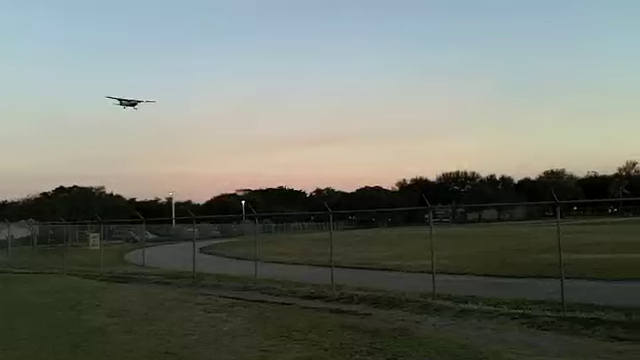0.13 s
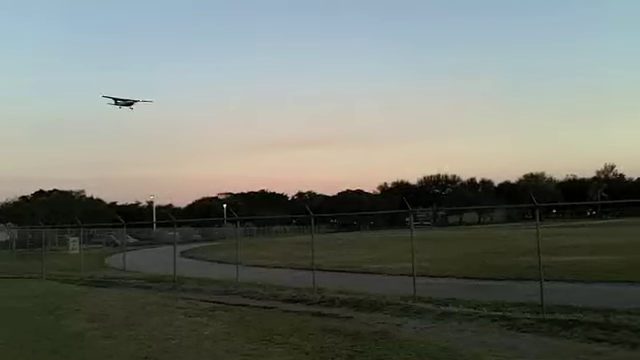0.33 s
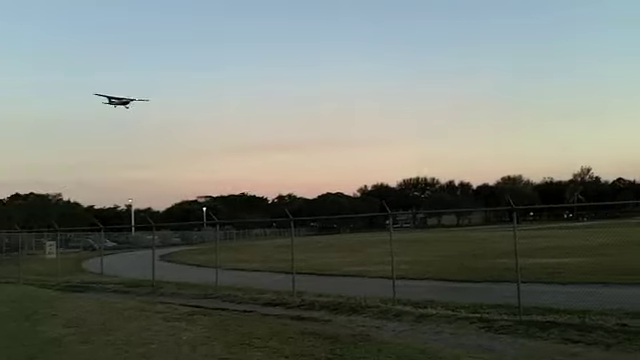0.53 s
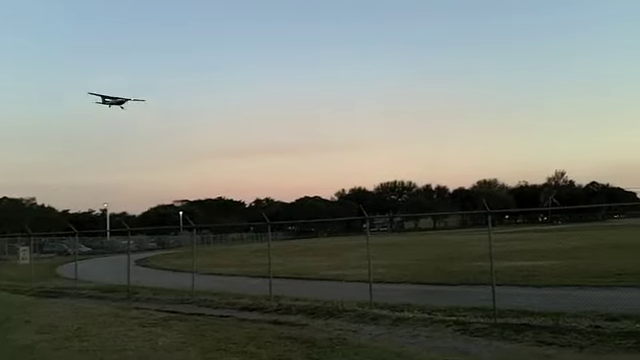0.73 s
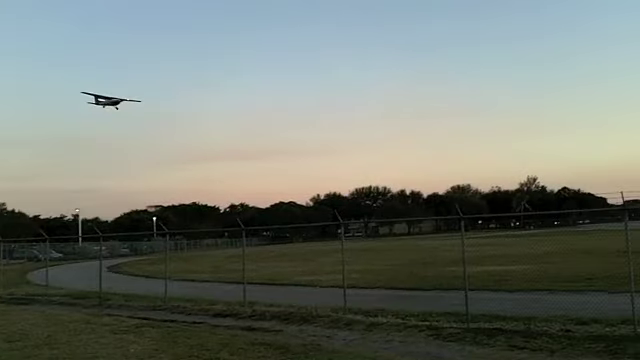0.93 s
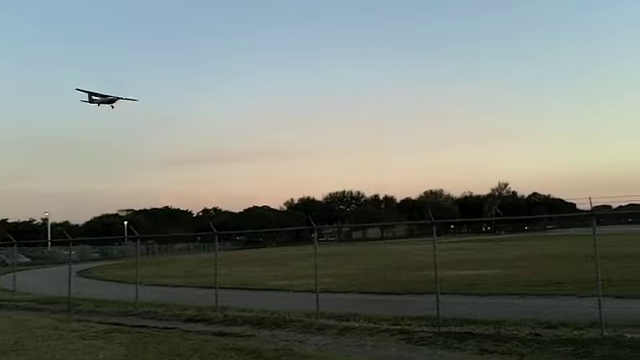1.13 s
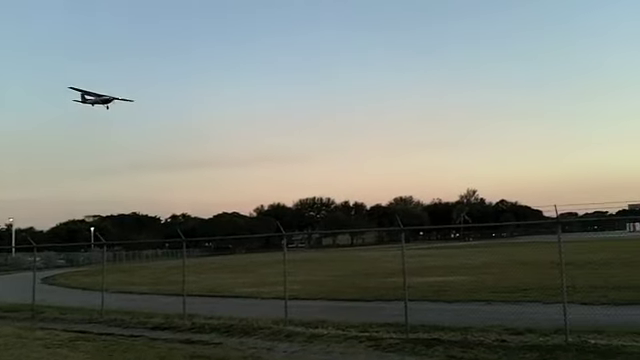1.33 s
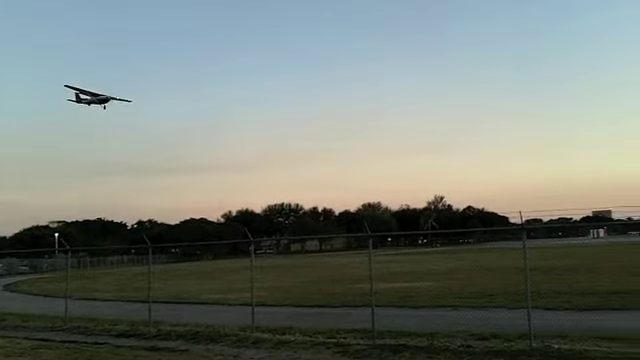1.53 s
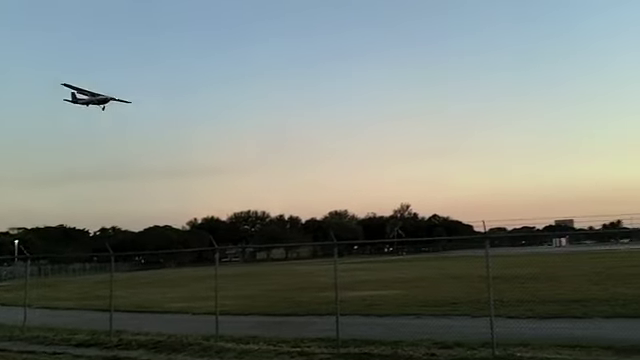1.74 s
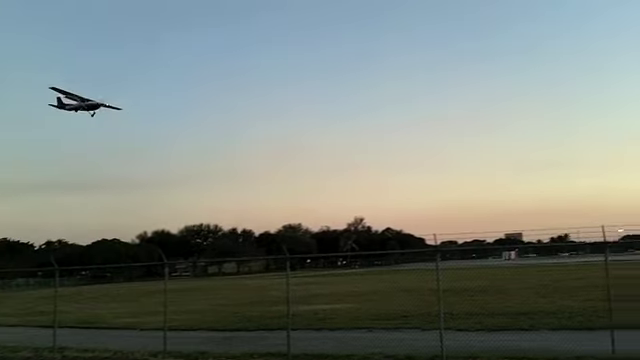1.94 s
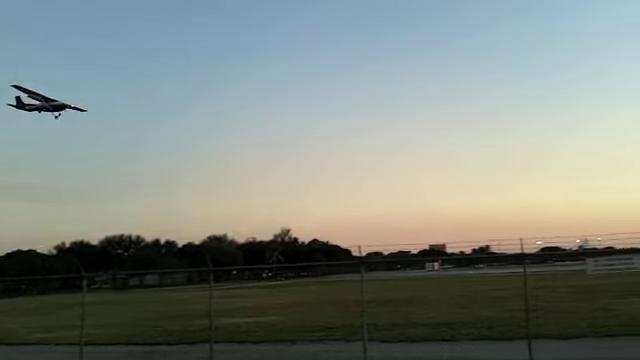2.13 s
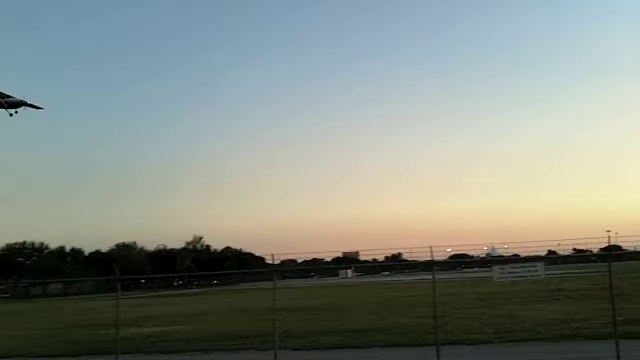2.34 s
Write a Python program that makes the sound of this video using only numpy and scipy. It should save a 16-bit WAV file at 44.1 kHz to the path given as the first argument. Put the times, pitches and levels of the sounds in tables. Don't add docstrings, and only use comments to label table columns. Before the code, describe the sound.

A small propeller plane approaches low over an open airfield, its throbbing drone swelling and sagging in pitch, with rushing propeller wind. A parked engine ticks and hums behind; small camera microphone, dull treble, faint hiss.

```python
import sys
import numpy as np
from scipy import signal
from scipy.fft import rfft, irfft, next_fast_len
from scipy.io import wavfile
from scipy.ndimage import uniform_filter1d, map_coordinates

SR = 44100
rng = np.random.default_rng(int(sys.argv[2]) if len(sys.argv) > 2 else 0)


def ratio_of_db(decibels):
    return 10 ** (np.asarray(decibels, float) / 20)


def store_pcm(level_fs):
    pcm = np.round(np.clip(level_fs, -1, 1) * 32767).astype(np.int16)
    wavfile.write(sys.argv[1], SR, np.atleast_2d(pcm).T)


N = 110250
T = np.arange(N) / SR


def unit(x):
    return x / np.sqrt(np.mean(x ** 2) + 1e-20)


def curve(rows):
    return np.interp(T, *np.transpose(rows))


def wobble(rate_hz):
    coarse = T[::64]
    points = rng.standard_normal(int(N * rate_hz / SR) + 4)
    return np.interp(T, coarse, map_coordinates(points, [coarse * rate_hz]))


def filtered(x, response):
    m = next_fast_len(N + 8192)
    return irfft(rfft(x, m) * response(np.fft.rfftfreq(m, 1 / SR)), m)[..., :N]


def low_pass(x, corner_hz, order):
    return filtered(x, lambda hz: 1 / (1 + (hz / corner_hz) ** order))


def rush(points, patchy_db):
    z = signal.stft(rng.standard_normal(N), nperseg=512)[2]
    patches = uniform_filter1d(rng.standard_normal(z.shape), 8, 0)
    patches = uniform_filter1d(patches, 4, 1)
    x = signal.istft(z * ratio_of_db(patchy_db * unit(patches)), nperseg=512)[1][:N]
    f, db = np.transpose(points)
    return unit(filtered(x, lambda hz: ratio_of_db(np.interp(np.log(hz + 1), np.log(f), db, -120, -120))))


def gate(turns, start, share, edge, scatter_db):
    u = turns - start + 1
    sizes = ratio_of_db(scatter_db * rng.standard_normal(200))[u.astype(int)]
    return sizes * np.clip(np.minimum(u % 1, share - u % 1) / edge, 0, 1)


def tone(turns, db, wobble_db, wander):
    level = ratio_of_db(db + wobble_db * wobble(5.88))
    return np.sqrt(2) * level * np.cos(2 * np.pi * turns + wander * wobble(8))


# (f/Hz, level/dB per Hz)
HISS_COLOUR = [(3000, 0), (11500, 0), (13000, -3), (16000, -4)]
# (f/Hz, level/dB rms)
WHINE_TONES = [(11538, -83), (13966, -84), (14566, -85.5)]


def camera_noise():
    frame_hz, mains_hz = 29.97, 59.94
    hiss = ratio_of_db(-69) * rush(HISS_COLOUR, patchy_db=1.5)
    whine = sum(tone(hz * T, db, wobble_db=1.5, wander=.1) for hz, db in WHINE_TONES)
    whine = whine * unit(gate(frame_hz * T, start=.33, share=.5, edge=.12, scatter_db=1))
    clicks = np.diff((mains_hz * T + 1 - .62).astype(int), prepend=0)
    buzz = unit(filtered(clicks, lambda hz: np.exp(-((hz - 8000) / 600) ** 2)))
    return hiss + whine, ratio_of_db(-91) * buzz


# (f/Hz, level/dB rms)
IDLING_TONES = [(54.3, -42.5), (67.7, -45.5), (102.2, -40), (108.5, -45.5), (135.4, -47), (163, -46),
                (217, -53.5)]
# (f/Hz, level/dB per Hz)
RUMBLE_COLOUR = [(12, -20), (25, -5), (45, -8.5), (110, 10), (170, -3), (260, -15), (500, -44)]
# (f/Hz, level/dB per Hz)
AIR_COLOUR = [(200, -19), (480, 0), (680, -3), (1200, -0.5), (2000, -4.5), (4300, -11.5), (7500, -25.5),
              (10000, -41)]


def airfield():
    hum = sum(tone(hz * T + rng.random(), db, wobble_db=1.5, wander=.74) for hz, db in IDLING_TONES)
    rumble = ratio_of_db(-35.5 + .88 * wobble(6.9)) * rush(RUMBLE_COLOUR, patchy_db=.9)
    air = ratio_of_db(-42.5 + .27 * wobble(5.4)) * rush(AIR_COLOUR, patchy_db=1.0)
    return hum + rumble + air


# (multiple of its turning speed, level/dB rms)
PARKED_TONES = [(1, -44.5), (2, -38), (3, -38), (4, -47)]
# (f/Hz, level/dB per Hz)
TICK_COLOUR = [(400, -23), (900, -11.5), (1400, 10), (2200, -6.5), (4000, -24)]


def parked_engine():
    turns = 39.62 * T
    drone = sum(tone(k * (turns - .518), db, wobble_db=.7, wander=.15) for k, db in PARKED_TONES)
    strong = gate(turns, start=.43, share=.08, edge=.025, scatter_db=1.5)
    weak = gate(turns + .5, start=.43, share=.08, edge=.025, scatter_db=1.5)
    ticks = (strong + ratio_of_db(-9) * weak) * rush(TICK_COLOUR, patchy_db=0)
    return drone + ratio_of_db(-50.5) * unit(ticks)


# (f/Hz, level/dB per Hz)
WASH_COLOUR = [(120, -34), (250, 3.5), (400, -5), (900, -8.5), (2000, -9), (4200, -7.5), (6000, -11.5),
               (10000, -39)]


def slipstream(near_db, beat_db):
    return ratio_of_db(-43 + near_db + beat_db) * rush(WASH_COLOUR, patchy_db=2.0)


# (f/Hz, level/dB per Hz)
SIZZLE_COLOUR = [(2000, -13), (3000, 5), (8500, -14), (12000, -23.5), (15500, -26)]


def sizzle(near_db, beat_db):
    return ratio_of_db(-49 + 3.4 * near_db + beat_db) * rush(SIZZLE_COLOUR, patchy_db=3.5)


# (t/s, delay/ms)
GRASS_DELAY = [(.1, .68), (.6, .71), (1.5, .79), (2.5, 1.02)]


def grass_echo(wash):
    late = map_coordinates(wash, [np.arange(N) - curve(GRASS_DELAY) * SR / 1000])
    return ratio_of_db(-1) * low_pass(late, corner_hz=2500, order=2)


# (t/s, f/Hz)
SLIDING_PITCH = [(.1, 950), (1.2, 830), (1.5, 765), (2, 710), (2.5, 655)]


def sliding_band(near_db):
    breath_a = low_pass(rng.standard_normal(N), corner_hz=50, order=2)
    breath_b = low_pass(rng.standard_normal(N), corner_hz=50, order=2)
    swing = 2 * np.pi * np.cumsum(curve(SLIDING_PITCH)) / SR
    ring = breath_a * np.sin(swing) + breath_b * np.cos(swing)
    return ratio_of_db(-46.5 + 2.2 * near_db) * unit(ring)


CHUFF_START = .6
# (f/Hz, width/Hz, level/dB, growth per dB of nearness)
CHUFF_BANDS = [(4000, 340, -57, 1.1), (6220, 850, -55, 1.5), (8740, 1040, -61, 3)]


def chuffs(turns, near_db):
    skirt_db = -11.5
    out = 0
    for hz, width, db, grows in CHUFF_BANDS:
        band = [(hz - 3 * width, 3 * skirt_db), (hz - width, skirt_db), (hz, 0),
                (hz + width, skirt_db), (hz + 3 * width, 3 * skirt_db)]
        puffs = gate(turns, CHUFF_START, share=.33, edge=.04, scatter_db=2.2)
        whistle = unit(puffs * rush(band, patchy_db=3))
        out = out + ratio_of_db(db + grows * near_db) * whistle
    return out


# (multiple of shaft speed, level/dB rms, growth per dB of nearness)
PLANE_TONES = [(1, -41.5, 1.5), (2, -33, 0.82), (3, -40.5, 1), (4, -56.5, 2.5), (5, -52, 1), (6, -48, 2.5),
               (7, -50, 2.5), (8, -50.5, 1.48), (9, -62.5, 0), (10, -63.5, -0.7), (14, -64, 3.5),
               (15, -58, 0), (16, -59.5, 0)]


def engine_tones(turns, near_db):
    out = 0
    for k, db, grows in PLANE_TONES:
        phase = k * (turns - .9 - .03 * k)
        out = out + tone(phase, db + grows * near_db, wobble_db=1.6, wander=.13 * k)
    return out


# (t/s, f/Hz)
SHAFT_SPEED = [(.3, 48.4), (.6, 47.9), (.9, 46.7), (1.2, 45.9), (1.5, 45.55), (1.8, 45.1), (2.1, 44.5),
               (2.4, 44.05)]
# (t/s, level/dB)
NEARNESS = [(.1, -10), (.5, -7), (.9, -7.5), (1.3, -4), (1.6, -2), (1.9, -1), (2.2, 0), (2.5, 1.5)]


def plane():
    turns = np.cumsum(curve(SHAFT_SPEED)) / SR
    near_db = curve(NEARNESS)
    beat_db = 1.5 * np.cos(2 * np.pi * (turns - CHUFF_START - .2)) + .37 * wobble(4.27)
    wash = slipstream(near_db, beat_db)
    wind = wash + grass_echo(wash) + sizzle(near_db, beat_db)
    bands = sliding_band(near_db) + chuffs(turns, near_db)
    return wind + bands + engine_tones(turns, near_db)


def scene():
    return (airfield() + parked_engine() + plane())[None]


# (f/Hz, width/Hz, depth/dB)
CAMERA_NOTCHES = [(2713, 750, -33), (5491, 520, -32), (7881, 900, -32), (10920, 650, -50)]


def camera_response(hz):
    gain = np.where(hz > 5020, ratio_of_db(-4), 1)
    for centre, width, db in CAMERA_NOTCHES:
        away = (hz - centre) ** 2
        gain = gain * np.sqrt((away + (ratio_of_db(db) * width) ** 2) / (away + width ** 2))
    return gain


def top_cut(x):
    return signal.sosfilt(signal.butter(12, 15220, fs=SR, output="sos"), x)


def record(dry):
    open_s, fade_s = .084, .11
    own, buzz = camera_noise()
    fade = np.clip((T - open_s) / fade_s, 0, 1) ** .89
    mix = (filtered(dry + own, camera_response) + buzz) * fade
    return top_cut(mix)


dry = scene()
out = record(dry)
store_pcm(out)
```